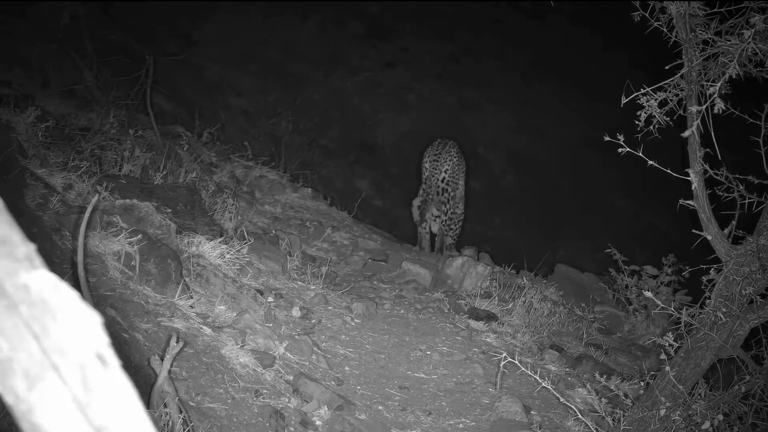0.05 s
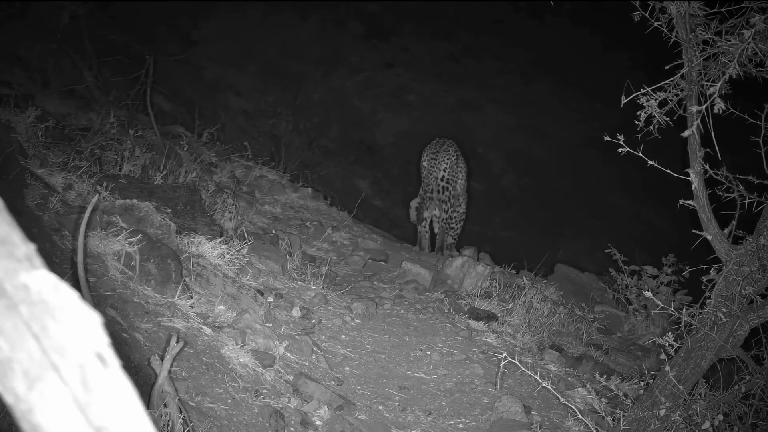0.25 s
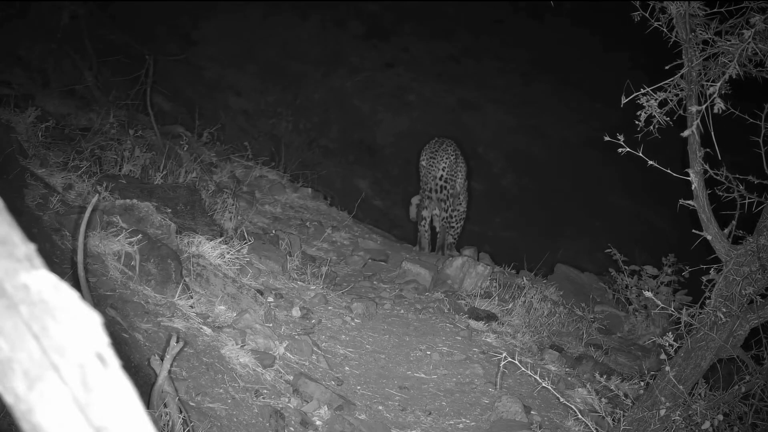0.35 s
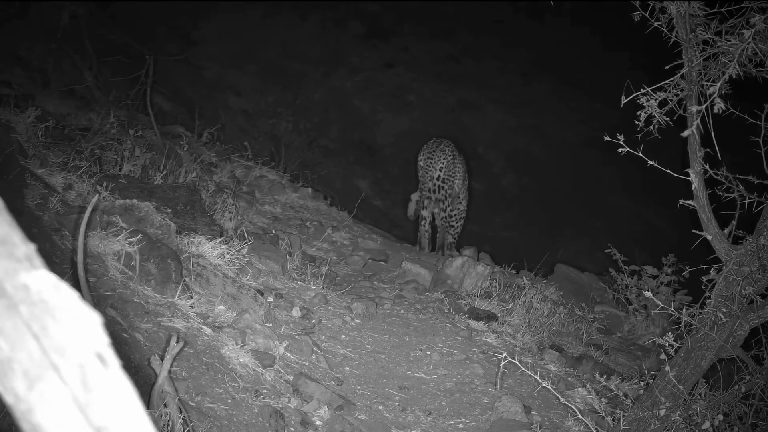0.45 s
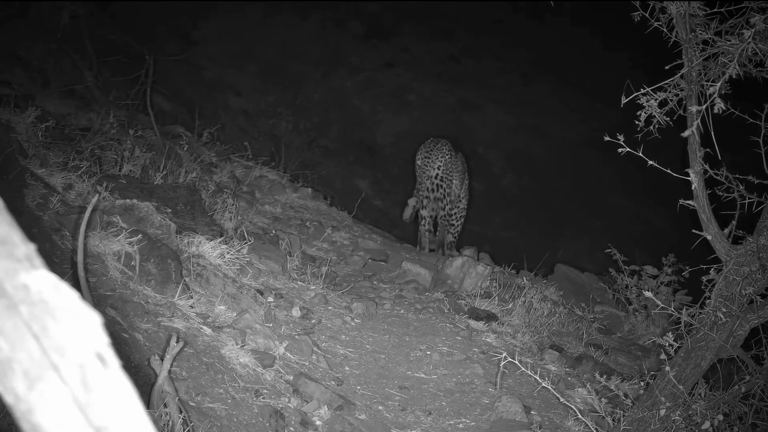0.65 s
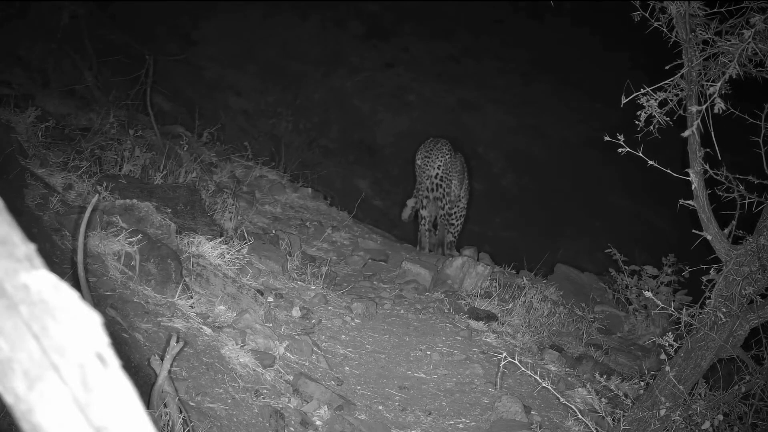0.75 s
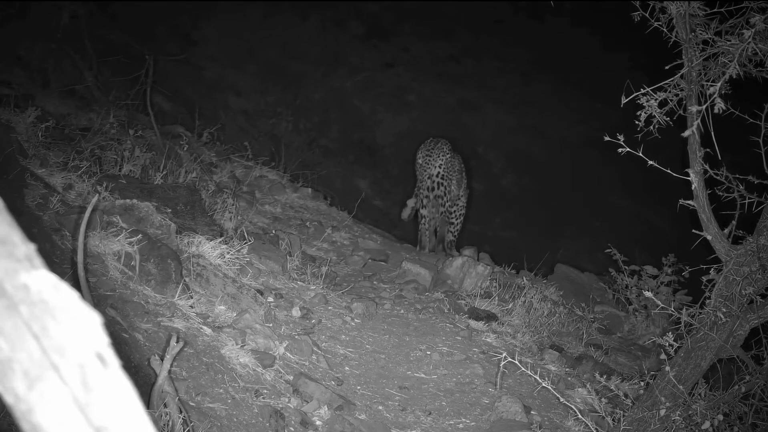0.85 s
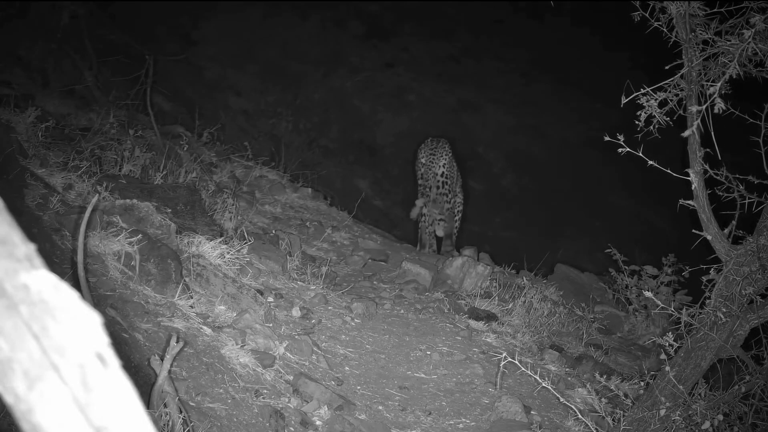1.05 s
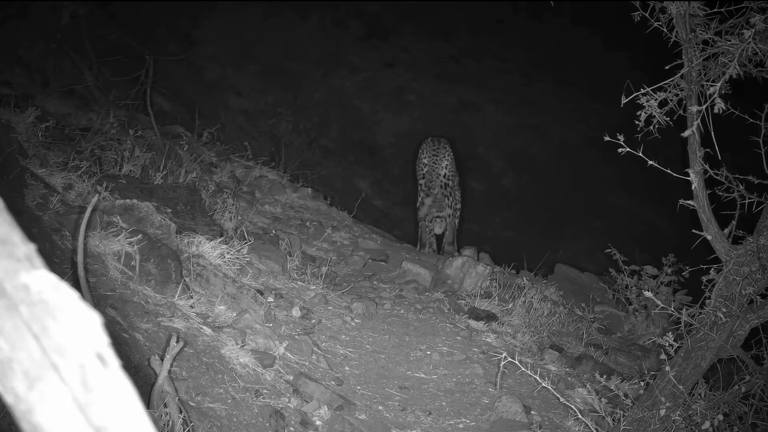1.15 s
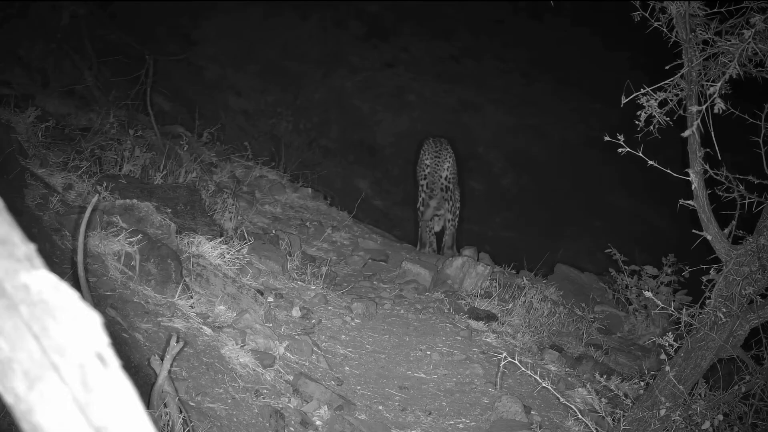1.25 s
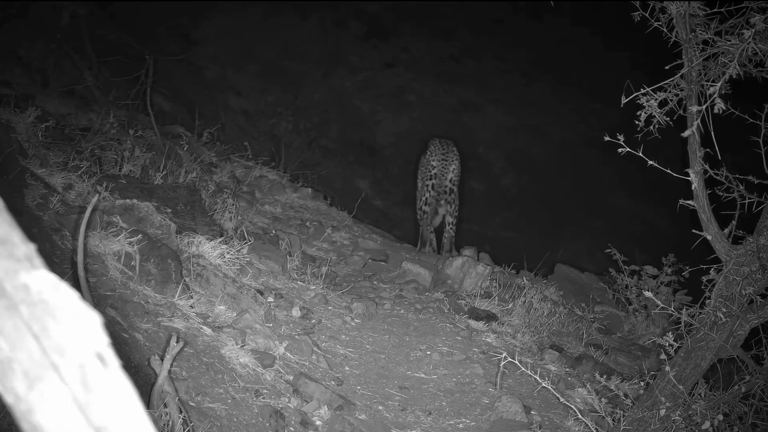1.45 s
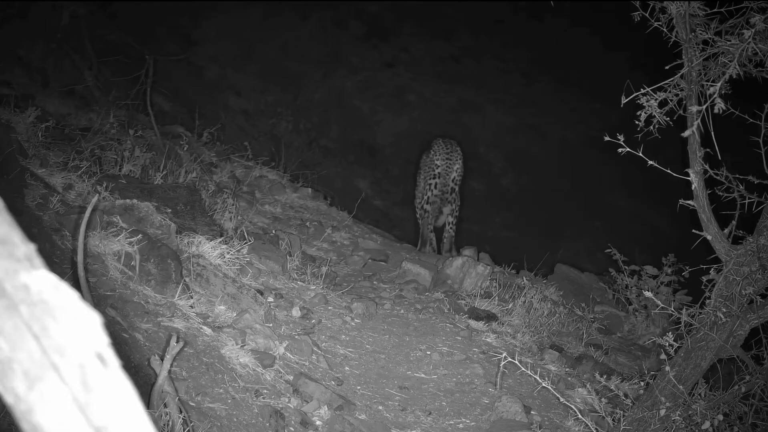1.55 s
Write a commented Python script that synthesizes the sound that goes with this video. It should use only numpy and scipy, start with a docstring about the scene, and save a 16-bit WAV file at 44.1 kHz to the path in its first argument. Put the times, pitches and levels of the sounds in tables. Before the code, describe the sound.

A leopard calls twice outdoors at night, each time a weak rasping in-breath followed by a loud, hoarse cough with a short echo. Faint, distant insect-like chirps join the second call, over steady low rumble and hiss.

```python
"""Leopard sawing at night

A leopard calls twice at a trail camera: a weak rasping in-stroke, then a loud, hoarse cough. Slack vocal
folds flap unevenly and set off a hollow ring, probably the camera case; the slope returns a short echo.
Far off runs a string of thin falling chirps. Low rumble, hiss and the camera's faint buzz lie beneath."""
import sys
import numpy as np
from scipy import signal
from scipy.fft import rfft, irfft
from scipy.io import wavfile
from scipy.ndimage import uniform_filter1d

SR = 44100
rng = np.random.default_rng(int(sys.argv[2]) if len(sys.argv) > 2 else 0)


def wav_record(signal):
    """Record a signal, one row per channel, as 16-bit PCM in the file named by sys.argv[1]."""
    frames = np.transpose(np.atleast_2d(signal))
    bounded = np.clip(frames, -1, 1)
    # unit amplitude maps onto the largest positive 16-bit level
    quanta = np.round(bounded * 32767).astype(np.int16)
    wavfile.write(sys.argv[1], SR, quanta)


N = 70560
T = np.arange(N) / SR

# Levels in the tables are relative; each source sets its own balance.
# Spectra of the steady background at the microphone (f/Hz, level/dB)
RUMBLE_SPECTRUM = [(25, -38), (60, -33.5), (110, -18), (165, -22.5), (300, -16), (380, -20), (480, -15),
                   (550, -13), (585, -4), (610, 2), (640, -12), (720, -15.5), (800, -17.5), (1100, -27.5),
                   (1350, -32.5), (1600, -30.5), (1900, -36.5), (2600, -56), (5000, -79)]
HISS_SPECTRUM = [(1290, -15), (2200, -4), (3020, -4.5), (3340, -1), (4060, -6.5), (4580, -2), (6000, -5.5),
                 (6960, -5), (9550, -6.5), (10300, -6), (11000, -3.5), (14300, -8), (22000, -120)]
# The two partials of one electric tick (f/Hz, lag/s, width/s, level/dB)
TICK_PARTIALS = [(10276, 0, .00036, -49.5), (9071, .0003, .00028, -55)]
# Fold tone, one list per in-stroke (t/s, level/dB)
IN_STROKE_LEVELS = [
    [(0.07, -50), (0.1, -43.5), (0.124, -58), (0.138, -50), (0.196, -45), (0.222, -40), (0.3, -52)],
    [(0.83, -57), (0.86, -46.5), (0.882, -48.5), (0.902, -42.5), (0.92, -53), (0.95, -39), (1.048, -52.5),
     (1.07, -56)],
]
# Bursts of rasp, one list per in-stroke (t/s, length/s, level/dB)
IN_STROKE_BURSTS = [
    [(.096, 0.02, -32.5), (.122, 0.036, -35.5), (.162, 0.018, -32.5), (.2, 0.028, -30.5),
     (.235, 0.022, -30.5), (.258, 0.035, -38.5)],
    [(.882, 0.0207, -32), (.922, 0.053, -30.5), (.98, 0.017, -41.5), (1.028, 0.055, -38)],
]
# Colour of the in-stroke's rasp, including the camera case's hollow ring (f/Hz, level/dB)
IN_STROKE_RASP_SPECTRUM = [(40, -38), (90, -10.5), (140, -19.5), (210, -21.5), (270, -18.5), (380, -25.5),
                           (480, -17.5), (530, -27.5), (565, -9.5), (605, 1.5), (650, -5), (720, -29.5),
                           (850, -20), (930, -28.5), (1030, -36.5), (1650, -35.5), (2500, -44.5),
                           (4000, -65)]
# Middle of the whine's fall in each in-stroke (t/s)
WHINE_FALL_TIMES = [.185, .925]
# Whistling overtones of the throat (centre t/s, width/s, f/Hz, level/dB)
THROAT_WHISTLES = [(.105, 0.035, 965, -50), (0.21, 0.023, 890, -48), (0.389, 0.03, 788, -37),
                   (.965, 0.024, 934, -43), (1.15, 0.022, 842.6, -29)]
# Spectrum that the slope returns (f/Hz, level/dB)
SLOPE_SPECTRUM = [(40, -6), (100, 2.5), (165, -8), (300, -5), (435, 6), (600, -4), (800, 2.5), (1500, 1.5),
                  (4000, -8.5)]
# Fold tone and rushing air, one list per cough (t/s, tone level/dB, air level/dB)
COUGH_LEVELS = [
    [(0.315, -43.5, -55), (0.355, -35, -51), (0.365, -36, -39.5), (0.383, -19, -48), (0.395, -22.5, -41.5),
     (0.527, -46.5, -54), (0.55, -50, -55)],
    [(1.075, -49, -66), (1.113, -33.5, -50.5), (1.121, -35, -47), (1.151, -23.5, -37.5),
     (1.197, -28.5, -46), (1.227, -42, -53), (1.267, -34.5, -54), (1.331, -56, -60), (1.343, -51, -63),
     (1.35, -51, -58)],
]
# Bursts of bark and the longer, quieter echo that follows, one list per cough (t/s, length/s, level/dB)
BARK_AND_ECHO_BURSTS = [
    [(.322, 0.026, -27), (.344, 0.02, -21.5), (.367, 0.0056, -32.5), (.377, 0.0078, -13),
     (.399, 0.032, -13), (.442, 0.016, -28), (.482, 0.06, -31)],
    [(1.078, 0.058, -35.5), (1.114, 0.021, -26), (1.137, 0.043, -16.5), (1.185, 0.015, -28.5),
     (1.228, 0.081, -32.5), (1.372, 0.034, -39.5)],
]
# Colour of the cough's rasp, including the camera case's hollow ring (f/Hz, level/dB)
COUGH_RASP_SPECTRUM = [(40, -69.5), (130, -37), (250, -28), (350, -34.5), (405, -30), (433, -20),
                       (470, -26), (540, -16), (580, -2), (609, -1.5), (632, -4.5), (655, 0), (685, -7),
                       (735, -11.5), (800, -15), (835, -18), (875, -32.5), (1100, -51), (2000, -53),
                       (4000, -90.5)]
# Spectra of a cough's rushing air and of the air shaken in the chest (f/Hz, level/dB)
AIR_SPECTRUM = [(500, -46.5), (900, 5.5), (1120, 7), (1380, -1), (1620, 4.5), (1760, -10), (1880, -3),
                (2200, -13.5), (2700, -27.5), (5500, -26.5), (8000, -50)]
CHEST_SPECTRUM = [(25, -17.5), (60, 0), (85, -3), (125, 3.5), (200, -32), (400, -48)]
# Spectrum of the rustle (f/Hz, level/dB)
RUSTLE_SPECTRUM = [(1500, -37), (2800, -1.5), (3400, 1.5), (4200, -17), (5400, 0.5), (6500, -31),
                   (10000, -32)]
# Distant pips (centre t/s, width/s, f/Hz, level/dB)
FAR_PIPS = [(0.454, 0.011, 2990, -61.5), (1.334, 0.0043, 2630, -61), (1.425, 0.034, 1616, -59.5),
            (1.475, 0.002, 2580, -54)]
# Distant chirps (start t/s, level/dB)
FAR_CHIRPS = [(0.849, -61), (0.887, -61), (0.934, -56.5), (0.989, -57), (1.047, -53.5), (1.115, -55),
              (1.183, -54), (1.252, -54), (1.323, -53), (1.399, -54.5)]


def undb(db):
    """Decibels to gain."""
    return 10 ** (np.asarray(db) / 20)


def unit(x):
    """Scale to rms 1."""
    return x / np.sqrt(np.mean(x ** 2))


def sine(hz):
    """A sine that follows a pitch curve."""
    return np.sin(2 * np.pi * np.cumsum(hz) / SR)


def swell(centre, width):
    """A bell-shaped rise and fall; the width is its standard deviation."""
    return np.exp(-.5 * ((T - centre) / width) ** 2)


def colour(x, spectrum):
    """Causal filter with the given (f/Hz, level/dB) outline; the result has rms 1."""
    hz, db = np.array(spectrum, float).T
    freq = np.maximum(np.arange(N // 2 + 1) * SR / N, 1)
    gain = undb(np.interp(np.log(freq), np.log(hz), db))
    cepstrum = irfft(np.log(gain), N)
    cepstrum[1:N // 2] *= 2  # minimum phase
    cepstrum[N // 2 + 1:] = 0
    return unit(irfft(rfft(x) * np.exp(rfft(cepstrum)), N))


def noise(spectrum):
    """Coloured noise at rms 1."""
    return colour(rng.standard_normal(N), spectrum)


def wander(hz):
    """Smooth random drift at rms 1."""
    step = max(int(SR / hz), 1)
    stairs = np.repeat(rng.standard_normal(N // step + 1), step)
    return unit(uniform_filter1d(stairs, step)[:N])


def steady(x, seconds):
    """Hold a sound near rms 1, keeping the flutter faster than the given time."""
    power = uniform_filter1d(np.abs(signal.hilbert(x)) ** 2 / 2, max(int(seconds * SR), 1))
    return unit(x / np.sqrt(power + 0.048))


def envelopes(table, fade_s=.014):
    """One gain curve for each level column, closed softly at both ends."""
    times, *levels = np.array(table, float).T
    gate = np.clip(np.minimum(T - times[0], times[-1] - T) / fade_s + 1, 0, 1)
    return [gate * undb(np.interp(T, times, db)) for db in levels]


def burst_gain(table, attack_s=.0043, release_s=.0069):
    """A run of bursts: each snaps open, holds and dies quickly."""
    gain = np.zeros(N)
    for start, length, db in table:
        attack = np.clip((T - start) / attack_s, 0, 1)
        release = np.exp(-np.maximum(T - start - length, 0) / release_s)
        gain += undb(db) * attack * release
    return gain


def night_air(rumble_db=-42, wander_db=.8, hiss_db=-57):
    """Low rumble with a hollow ring, probably from the camera case, under even hiss."""
    rumble = steady(noise(RUMBLE_SPECTRUM), seconds=.046)
    rumble *= undb(rumble_db + wander_db * wander(8.7))
    return rumble + undb(hiss_db) * noise(HISS_SPECTRUM)


def camera_buzz(rate_hz=100.3, start_s=.0039, scatter=.62):
    """Electronics beside the microphone: a regular train of tiny, very high ticks of uneven strength."""
    out = np.zeros(N)
    for hz, lag, width, db in TICK_PARTIALS:
        from_tick_s = (((T - start_s - lag) * rate_hz + .5) % 1 - .5) / rate_hz
        angle = 2 * np.pi * hz * T
        grit = wander(1200) * np.sin(angle) + wander(1200) * np.cos(angle)
        out += undb(db) * np.exp(-.5 * (from_tick_s / width) ** 2) * (np.sin(angle) + scatter * grit)
    return out


def vocal_folds(start, hz, sag_hz_per_s, jitter, shimmer_db, breath):
    """Uneven flaps of the folds: their round tone, their sharp closures with noise, and puffs of air."""
    rate = (hz - sag_hz_per_s * np.clip(T - start, 0, .25)) * (1 + jitter * wander(130))
    cycles = np.cumsum(rate) / SR
    strength = undb(shimmer_db * wander(120))
    tone = unit(np.sin(2 * np.pi * cycles) * np.sqrt(strength))
    closures = unit(np.diff(np.floor(cycles), prepend=0) * strength)
    airflow = .12 + np.exp(-(cycles % 1) / .5)
    puffs = unit(rng.standard_normal(N) * airflow * strength)
    return tone, closures + breath * puffs, puffs


def in_stroke(levels, bursts, fall_time, fall_s=.074, whine_hz=(606, 549), rasp_db=-6.5, whine_db=-2.5):
    """Breath drawn in: low, loose flapping, a dark rasp and a falling whine from the tight throat."""
    tone_gain, = envelopes(levels)
    start = levels[0][0]
    tone, flaps, _ = vocal_folds(start, hz=161.5, sag_hz_per_s=65, jitter=.2, shimmer_db=3, breath=.82)
    pitch = np.interp(T, [fall_time - fall_s / 2, fall_time + fall_s / 2], whine_hz)
    whine = undb(whine_db) * unit(sine(pitch * (1 + .0108 * wander(90))))
    rasp = undb(rasp_db) * steady(colour(flaps, IN_STROKE_RASP_SPECTRUM), seconds=.033)
    return tone_gain * tone + burst_gain(bursts) * (rasp + whine)


def throat_whistles():
    """Narrow, wavering overtones that stand out of the rasp for a moment."""
    waver = 1 + .009 * wander(110)
    return sum(undb(db) * swell(at, width) * sine(hz * waver) for at, width, hz, db in THROAT_WHISTLES)


def slope_echo(call, level_db=-15, delay_s=.05, t60_s=.72):
    """Rocks and trees on the slope scatter the call back to the microphone."""
    age = T - delay_s
    decay = (age > 0) * np.exp(-np.log(1000) * np.abs(age) / t60_s)
    echo = signal.fftconvolve(call, noise(SLOPE_SPECTRUM) * decay)[:N]
    return undb(level_db) * np.std(call) * unit(echo)


def bark(flaps, bursts, ring_hz=606.3, ring_db=2.5, band_hz=(300, 950)):
    """A cough's bursts of rasp and their echo, with a hollow ring, probably from the camera case."""
    ring = undb(ring_db) * unit(sine(ring_hz * (1 + .012 * wander(160))))
    rasp = steady(colour(flaps, COUGH_RASP_SPECTRUM), seconds=.014)
    ringing_rasp = burst_gain(bursts) * steady(ring + rasp, seconds=.0098)
    return signal.sosfilt(signal.butter(2, band_hz, "bandpass", fs=SR, output="sos"), ringing_rasp)


def cough(levels, bursts, flutter=.55, tone_db=-2, bark_db=-1.7, chest_db=-49, air_db=-2):
    """The out-stroke: a falling fold tone, a hoarse bark, a low shudder of the chest and rushing air."""
    tone_gain, air_gain = envelopes(levels)
    start = levels[0][0]
    tone, flaps, puffs = vocal_folds(start, hz=181.32, sag_hz_per_s=165,
                                     jitter=.04, shimmer_db=1, breath=1.43)
    slack = np.interp(T - start, [.05, .15], [0, 1])  # the folds slacken and their tone flutters
    tone *= tone_gain * (1 + flutter * slack * wander(80))
    hoarse = bark(flaps, bursts)
    loudest_s = max(levels, key=lambda row: row[1])[0]
    chest = swell(loudest_s + .052, width=.11) * noise(CHEST_SPECTRUM)
    air = air_gain * steady(colour(puffs, AIR_SPECTRUM), seconds=.01)
    return undb(tone_db) * tone + undb(bark_db) * hoarse + undb(chest_db) * chest + undb(air_db) * air


def rustle(level_db=-58):
    """A faint, brief rustle at the end of the first cough."""
    return undb(level_db) * swell(centre=.437, width=.03) * noise(RUSTLE_SPECTRUM)


def far_caller(chirp_s=.034, start_hz=3754, fall_hz=790, scatter_db=-3):
    """Far off, perhaps an insect: falling whistles and a few lower pips, smeared by the trees."""
    calls = sum(undb(db) * swell(at, width) * np.sin(2 * np.pi * hz * T) for at, width, hz, db in FAR_PIPS)
    for start, db in FAR_CHIRPS:
        progress = np.clip((T - start) / chirp_s, 0, 1)
        calls += undb(db) * np.sin(np.pi * progress) * sine(start_hz - fall_hz * progress ** 1.8)
    trees = rng.standard_normal(N) * np.exp(-T / .16)
    trees /= np.linalg.norm(trees)
    return calls + undb(scatter_db) * signal.fftconvolve(calls, trees)[:N]


def scene():
    """One microphone: the leopard in front, the slope and the night behind."""
    coughs = sum(cough(*stroke) for stroke in zip(COUGH_LEVELS, BARK_AND_ECHO_BURSTS))
    breaths = sum(in_stroke(*stroke)
                  for stroke in zip(IN_STROKE_LEVELS, IN_STROKE_BURSTS, WHINE_FALL_TIMES))
    leopard = coughs + breaths + throat_whistles()
    return (leopard + slope_echo(leopard) + far_caller() + rustle() + night_air() + camera_buzz())[None]


def record(dry):
    """The camera cuts off the top of the treble steeply."""
    cutoff_hz = 10950
    return signal.sosfilt(signal.ellip(10, .2, 80, cutoff_hz, fs=SR, output="sos"), dry)


dry = scene()
out = record(dry)
wav_record(out)
```